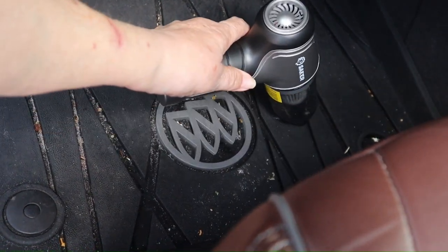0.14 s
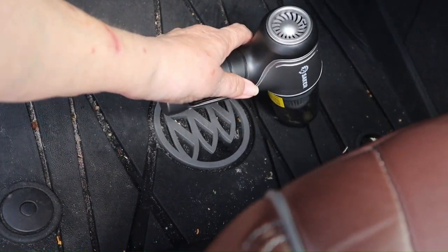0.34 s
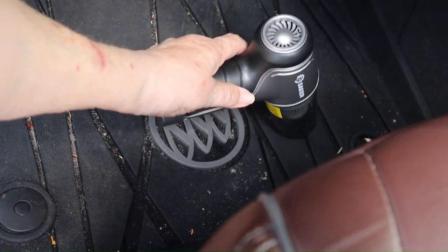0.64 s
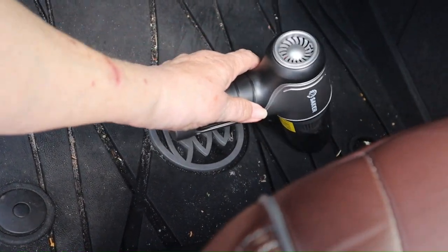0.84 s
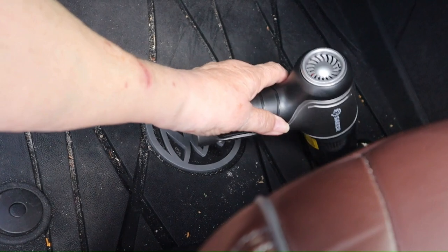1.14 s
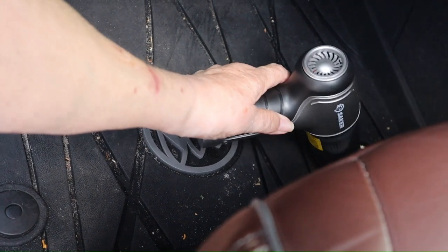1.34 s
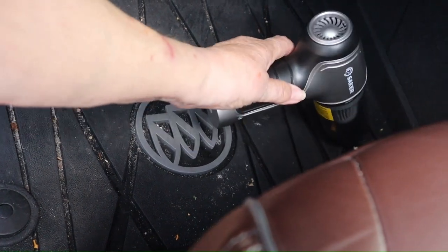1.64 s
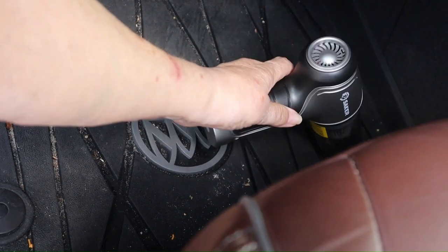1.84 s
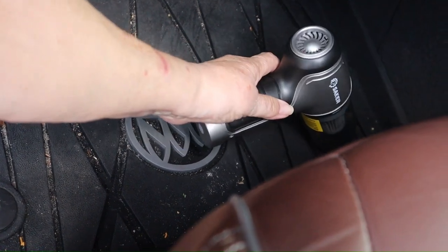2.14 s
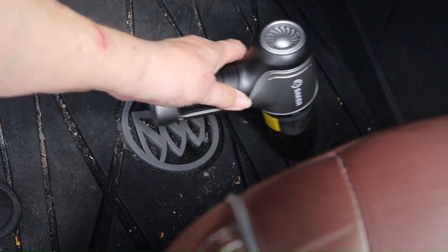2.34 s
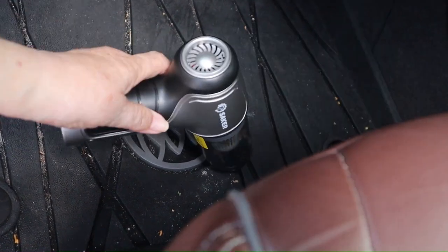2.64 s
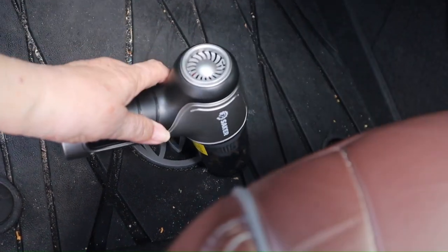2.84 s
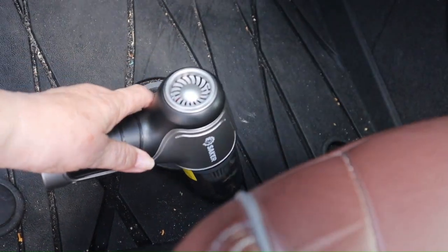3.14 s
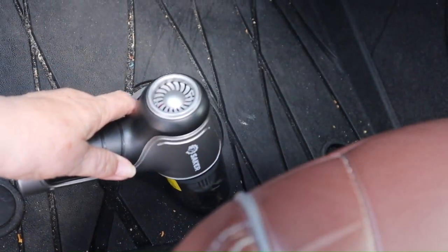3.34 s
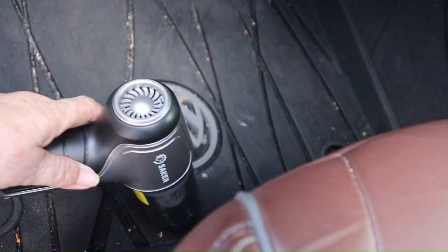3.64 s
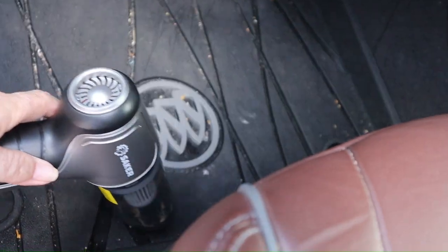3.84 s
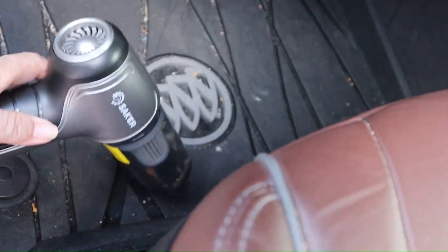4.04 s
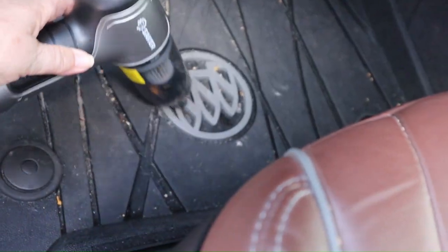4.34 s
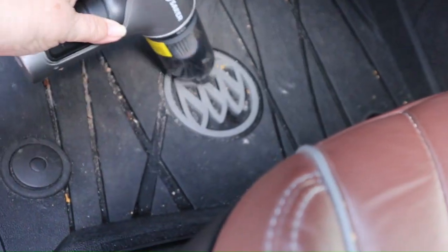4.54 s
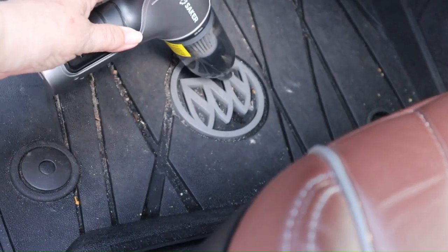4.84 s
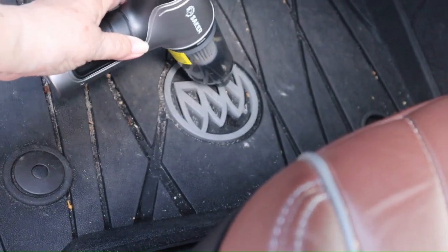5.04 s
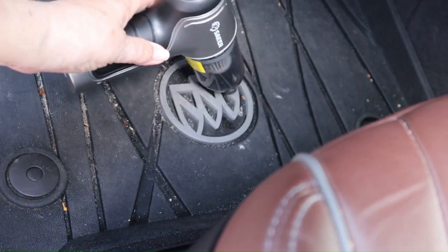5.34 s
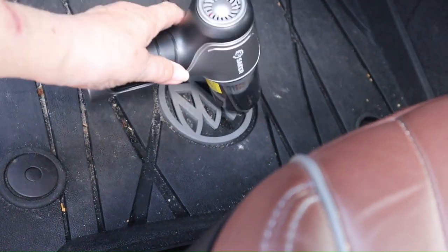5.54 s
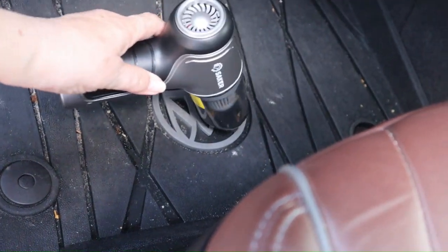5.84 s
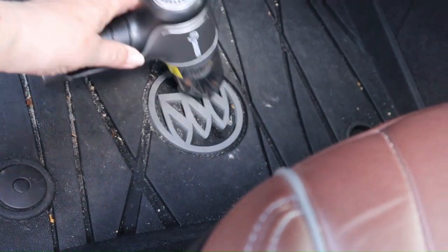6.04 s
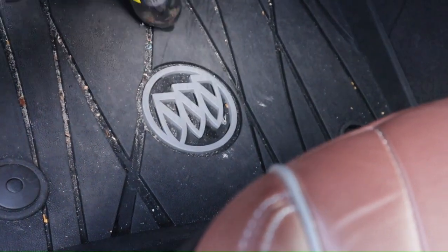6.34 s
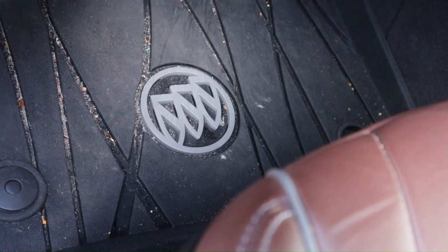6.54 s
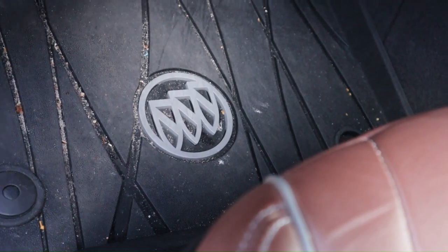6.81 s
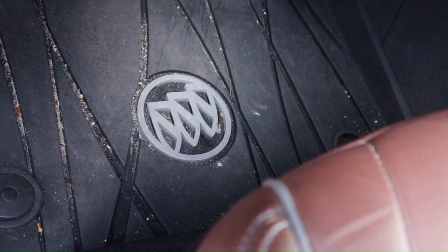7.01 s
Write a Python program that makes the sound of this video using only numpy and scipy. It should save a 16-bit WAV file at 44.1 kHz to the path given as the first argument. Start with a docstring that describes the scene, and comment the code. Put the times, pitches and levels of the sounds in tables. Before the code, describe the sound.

A close stereo pair catches a handheld vacuum working over a ribbed rubber mat in a small, dry car interior. Its whistling motor and airy hiss never stop. The tone wavers with each press, a burst of crumb clicks and gritty rasps comes before the middle, then the blocked nozzle makes the motor race higher. It drops back, continuing with dull bumps, fluttering air and short hisses, still running at the end.

```python
"""Cordless vacuum in a car footwell

Inside a car, a close stereo pair hears a small vacuum pushed over a ribbed rubber mat.
The motor whines near 1 kHz as summed harmonics; its speed also sets how far the nozzle counts as choked.
Coloured noise makes the rush, hiss and flutter of air, the gritty scuffs and short hisses in narrow bands.
Impulses ring the mat as bumps and the tube as crumb ticks; a faint hum and rumble fill the car."""
import sys
import numpy as np
from scipy import signal
from scipy.fft import rfft, irfft, next_fast_len
from scipy.io import wavfile

SR = 44100
rng = np.random.default_rng(int(sys.argv[2]) if len(sys.argv) > 2 else 0)


def dump_mix(stems):
    """Bounce the given channels to the path in sys.argv[1] as a 16-bit WAV at rate SR."""
    frames = np.atleast_2d(stems).T  # one column per channel
    limited = np.clip(frames, -1, 1)  # hard clip at full scale
    pcm = np.round(limited * 32767).astype(np.int16)
    wavfile.write(sys.argv[1], SR, pcm)


N = 316197
TIME = np.arange(N) / SR  # s

# car hum where the microphones are [t/s, level/dB]
CAR_HUM = [(0, -53), (3.5, -58), (4.1, -48), (6.0, -46.5), (7.17, -61)]
# colour of the car's rumble [f/Hz, density/dB]
CABIN_COLOUR = [(20, -26), (35, -27), (55, -2), (100, -9), (180, -2), (350, -3.5), (700, -21)]

# air at the two microphones: share of power in common [f/Hz, share 0-1]
MIC_LIKENESS = [(100, .985), (450, .96), (1000, .9), (2000, .8), (3000, .68), (6000, .63), (12000, .6)]
# phase by which the left microphone leads [f/Hz, lead/rad]
MIC_LEAD = [(0, 0), (1380, 0.08), (2150, 1.72), (2580, 1), (3530, 2), (4480, 4), (4910, 4), (5860, 4.5),
            (7150, 4.5), (7920, 4), (9730, 4), (15300, 4)]
# left-right balance of the air [f/Hz, left minus right/dB]
MIC_TILT = [(200, 1.1), (550, 0), (800, -5), (1400, 4.5), (2000, -6), (2800, 0), (3800, 1), (5200, 4),
            (7000, 0.5), (8500, -0.5), (11000, 1)]

# ringing modes of the mat on the floor [f/Hz, level/dB, t60/s]
MAT_MODES = [(62, -20, .12), (120, -7, .06), (175, 0, .035), (280, -6, .025), (480, -10, .02)]
# colour of the mat's shudder as the nozzle settles [f/Hz, density/dB]
SHUDDER_COLOUR = [(35, -28), (65, -17), (110, 5.5), (170, -2), (280, 1.5), (500, -0.5), (1200, -39),
                  (4000, -55)]
# nozzle bumps on the mat [t/s, thud level/dB, shudder level/dB]
BUMP_EVENTS = [(1.828, -25, -26), (2.297, -35, -30), (2.529, -37, -35), (2.666, -31, -39),
               (4.424, -29.5, -37), (4.633, -31, -35), (5.054, -22, -31), (5.248, -30.5, -35),
               (6.165, -36, -27), (6.469, -27, -31), (6.689, -32, -29)]
SHUDDER_T60_S = 0.24

# nozzle scuffs over grit [centre t/s, length/s, level/dB]
SCUFF_EVENTS = [(0.317, 0.045, -24), (0.48, 0.032, -24), (0.83, 0.024, -26), (0.966, 0.037, -21.5),
                (1.205, 0.028, -27), (1.303, .025, -31), (2.336, .025, -30), (2.534, .008, -22),
                (2.57, 0.023, -24), (2.605, 0.016, -17.5), (2.668, 0.01, -17.5), (2.756, 0.04, -23.5),
                (5.66, 0.54, -28), (6.147, 0.019, -25), (6.49, 0.15, -25.5)]
# colour of the grit [f/Hz, density/dB]
GRIT_COLOUR = [(100, -35), (400, -17), (1200, -16), (2000, -3), (2700, 0), (4000, -5), (8000, -7),
               (12000, -13), (15000, -27)]
GRAINS_PER_S, GRAIN_DECAY_S = 1100, .0007
# short band hisses: leaks under the lip, and resonances of the choked hiss near 3 s
# [centre t/s, length/s, level/dB, centre f/Hz, band width/Hz]
BAND_HISS_EVENTS = [(0.334, .025, -18, 2230, 600), (.45, .1, -25.5, 11000, 4000),
                    (.625, .03, -25, 11800, 2600), (.92, .04, -22, 11200, 1700),
                    (.96, .025, -25, 8700, 1000), (1.06, .05, -25.5, 2300, 700),
                    (1.2, .03, -25, 11200, 2000), (2.44, .03, -25, 4200, 1400),
                    (2.516, .006, -17, 2950, 500), (2.54, 0.018, -19, 2920, 600),
                    (2.538, .018, -25, 8400, 800), (2.576, .009, -19, 4300, 800),
                    (2.585, .02, -22, 11700, 3000), (2.609, .006, -18.5, 4200, 700),
                    (2.608, .007, -20, 8000, 1500), (2.63, .015, -25, 10700, 900),
                    (2.735, .015, -20.5, 10800, 900), (2.86, .2, -26.5, 5200, 900),
                    (3.0, .12, -27, 6700, 700), (3.33, .1, -32, 6200, 250), (3.53, .12, -29, 4150, 400),
                    (3.86, 0.18, -31, 3900, 2400), (5.673, 0.087, -22, 4500, 2600),
                    (5.91, .06, -27, 4000, 600), (6.065, .025, -27, 8300, 1400),
                    (6.13, .04, -22.5, 4200, 1600), (6.14, 0.028, -20, 2900, 900),
                    (6.19, 0.012, -15.5, 2680, 500), (6.49, .07, -27, 11500, 3800),
                    (6.62, .12, -24, 3500, 1400)]
# big crumbs in the tube, before a random strength [t/s, level/dB]
BIG_CRUMBS = [(2.3234, -18), (2.3774, -19), (2.4864, -20), (2.5138, -16), (2.5321, -15.5), (2.5504, -15),
              (2.5774, -16), (2.6055, -15.5), (2.6624, -14.5), (2.6862, -17), (2.7288, -19),
              (2.7984, -16.5)]
# ringing modes of plastic tube and dust cup [f/Hz, level/dB, t60/s]
CUP_MODES = [(2300, 0, .005), (3100, -1, 0.006), (4300, -3, 0.003), (6100, -5, .002), (8200, -7, 0.002),
             (11200, -8, .002)]

# colours of the air, nozzle open or choked [f/Hz, density/dB]
OPEN_RUSH = [(100, -64), (700, -35), (880, 0.5), (1150, -5.5), (1300, -5.5), (1700, -6), (2100, 4),
             (2400, 1), (2900, 3), (3350, -0.5), (3700, -4), (5000, -8.5), (12000, -63)]
CHOKED_RUSH = [(50, -50), (210, -10.5), (340, -23.5), (470, -13), (620, -33), (950, -9), (1080, -31),
               (1400, -29), (1750, -8.5), (2000, 5), (2500, -2), (2950, -5), (3500, -55), (6000, -40)]
# colours of the vent hiss, fan open or choked [f/Hz, density/dB]
OPEN_HISS = [(100, -12.5), (600, -6), (1200, -9), (2500, -3), (4000, 7.5), (4500, 0.5), (5200, 5.5),
             (6800, 6), (7700, -0.5), (8400, 9), (9400, 2.5), (10200, 3.5), (11500, 5), (13000, 0),
             (14500, -7.5), (15700, -55)]
CHOKED_HISS = [(200, -55), (2000, -4), (3500, -7.5), (4200, -1.5), (6300, -3), (7750, -7), (8250, 6.5),
               (8700, 3), (9400, -16), (10150, 0), (10750, -13), (11400, -2.5), (13000, -13), (15500, -23)]
# colour of the flutter at the mat [f/Hz, density/dB]
FLUTTER_COLOUR = [(25, -49), (80, -4), (150, -8), (260, -9), (380, 5), (520, 6), (660, -2.5), (800, 0.5),
                  (1200, -10.5), (4000, -62)]
# nozzle tube resonances under light load [f/Hz, half width at -6 dB/Hz, level/dB]
TUBE_MODES = [(1990, 160, 1.5), (2417, 76, 8), (2870, 82, 5), (2980, 170, 4.5), (8400, 150, -21)]
# resonances of the narrow gap between lip and mat [f/Hz, half width at -6 dB/Hz, level/dB]
GAP_MODES = [(590, 120, -6), (2530, 130, -1), (2850, 260, -3.5), (3380, 110, -2)]
TUBE_WAVER, GAP_WAVER = .015, .03  # rms share of the pitch
TUBE_FLICKER_DB = 2.2  # rms

# air layers, one row each [running free/dB, gain at full suction/dB, gain when choked/dB, share of shading]
RUSH_LEVELS = (-26.5, 4.5, 3, 0.95)
VENT_LEVELS = (-31.5, 6.5, -0.3, 0.77)
MAT_LEVELS = (-37.5, -3, -5, 3)
FREE_SPEED, SUCTION_SPAN = 1011.4, 83  # turns per s
# level of nozzle and vents as the body turns away and back [t/s, level/dB]
BODY_SHADE = [(0, 1.5), (1.3, 1), (1.62, 0.6), (1.85, 1.2), (2.3, 2), (3.4, 0), (3.7, -3), (4.15, -2.5),
              (4.7, -1), (5.9, 0.6), (6.6, 1), (6.85, -0.1), (7.17, 0.5)]
# lip pressed onto the mat; level changes may be negative
# [start t/s, end t/s, rush change/dB, hiss change/dB, flutter change/dB, gap howl/dB]
LIP_PRESSES = [(-.05, 0.266, 3, 2.5, -5.5, -39), (0.29, 0.452, 2, 1.2, -6, -50),
               (0.72, 0.955, -0.5, 1.8, 0, -34), (0.985, 1.168, 1.5, -1, 0, -50),
               (1.138, 1.476, 0, 0.2, 4, -24.5), (1.286, 1.332, 2, 1.5, 4, -27),
               (2.298, 2.339, 0.5, 1, 3, -24), (2.37, 2.5, 2.5, 2.5, 0.5, -34),
               (2.515, 2.587, 7, 6.5, 2.5, -46), (2.606, 2.8, 3.5, 2, -1.5, -51),
               (3.73, 4.006, 4, 0, 7.5, -43), (3.807, 3.898, -2.5, -2.5, 7.5, -42),
               (4.647, 4.857, 2.5, 0.5, 1, -54), (5.615, 5.774, 4.5, 1.5, 1.5, -32),
               (6.03, 6.224, 4, 3, -1.5, -35), (6.344, 6.743, 4, 1, 5, -34),
               (6.447, 6.63, -0.5, 0, -0.5, -40)]
PRESS_ATTACK_S, PRESS_RELEASE_S = 0.018, 0.015
FREE_HOWL_DB = -50  # before body shading

# motor speed [t/s, turns per s]
MOTOR_SPEED = [(0.0, 990), (0.39, 1096), (0.6, 1086), (0.78, 1042), (0.97, 1028), (1.09, 1074),
               (1.35, 1016), (1.6, 986), (2.49, 982), (2.57, 1031), (2.7, 1030), (2.86, 1073), (3.04, 1143),
               (3.21, 1240), (3.45, 1277), (3.56, 1261), (3.74, 1173), (3.89, 1052), (4.08, 985),
               (4.25, 955), (4.9, 971), (6.01, 978), (6.1, 1011), (6.23, 1005), (6.4, 1039), (6.7, 1022),
               (6.93, 995), (7.17, 987)]
SPIN_UP_S = 0.13  # the speed follows the choking by this much
# shaft tone as the body is turned in the hand [t/s, level/dB, left minus right/dB]
SHAFT_TONE = [(0, -21.5, -16), (.18, -18.5, -11.5), (.42, -26, -8.5), (.88, -21, -12), (1.25, -26.5, 1.5),
              (1.65, -27, 3), (2.27, -25, 3.5), (2.54, -22, -22), (2.7, -25.5, -23), (2.81, -33, 4),
              (3.0, -34, 2), (3.12, -23, -8), (3.47, -40, 5), (3.73, -25.5, 17), (4.17, -38, 6),
              (4.68, -25.5, -4), (5.32, -22.5, -2), (6.6, -23, 1.5), (7.17, -32, 3)]
# standing-wave nodes of the shaft tone sweep past the microphones [t/s, left lead/rad]
SHAFT_LEAD = [(0, 0), (2.65, -.2), (2.95, -4.1), (3.8, -4.6), (4.2, -12.4), (7.17, -12.4)]
# octave of the shaft tone [t/s, level/dB]
OCTAVE_TONE = [(0, -37), (.3, -31), (.7, -27), (1.0, -37), (1.15, -33), (1.38, -45), (1.53, -26),
               (2.5, -33), (3.0, -20), (3.17, -31), (3.5, -27), (3.75, -33.5), (4.7, -34.5), (5.35, -27),
               (6.03, -29.5), (6.12, -37), (6.75, -39), (7.1, -27.5)]
# upper whine before shading [t/s, third harmonic level/dB, fourth harmonic level/dB]
UPPER_WHINE = [(0, -27.5, -37), (.38, -27, -37), (.62, -31, -42), (.85, -27.5, -42), (1.2, -30.5, -39),
               (1.4, -36, -42), (1.55, -33, -45), (1.85, -40, -37.5), (2.35, -33, -39), (2.75, -32, -37),
               (3.1, -35, -41), (3.35, -39, -46), (3.75, -36, -38), (3.95, -28, -41), (4.15, -32.5, -43),
               (4.45, -29.5, -34), (4.75, -32.5, -36), (5.0, -27.5, -35), (5.55, -32, -35),
               (5.85, -29, -39), (6.2, -33, -40), (6.42, -29, -38), (6.55, -36, -38), (6.9, -31, -35),
               (7.17, -32.5, -39)]
# faint high harmonics before choking and shading [multiple of shaft speed, level/dB, left minus right/dB]
HIGH_HARMONICS = [(6, -47, 4), (8, -46, -6)]
# blade tone as the vents turn, before vent resonance and shading [t/s, level/dB]
BLADE_TONE = [(0, -33), (.12, -31), (.22, -26), (.45, -33), (.7, -32), (.9, -38), (1.1, -31), (1.4, -35),
              (1.62, -41), (1.85, -37), (2.3, -34), (2.5, -38), (2.95, -36), (3.15, -31.5), (3.48, -33.5),
              (3.72, -29), (3.86, -43), (4.05, -35), (4.2, -38), (4.35, -33), (4.65, -39), (4.85, -34),
              (5.08, -38), (5.3, -31.5), (5.7, -33), (5.87, -35), (6.06, -26.5), (6.2, -38), (6.5, -29),
              (6.8, -34), (6.97, -28), (7.17, -33)]
BLADES = 7
VENT_HZ, VENT_WIDTH_HZ, VENT_DB = 8420, 400, 10  # vent resonance: centre, half width, peak gain
# ball bearing's whistle before shading [t/s, whistle level/dB, first lower sideband level/dB]
BEARING_WHISTLE = [(0, -46, -46), (.2, -34, -44), (.33, -42, -47), (.62, -46, -46), (.78, -31.5, -46),
                   (1.0, -33.5, -47), (1.14, -41, -48), (1.28, -35.5, -48), (1.5, -48, -48),
                   (1.9, -45, -37), (2.35, -43, -38), (2.5, -44, -45), (2.73, -30, -45), (2.95, -41, -50),
                   (3.1, -37, -46), (3.45, -48, -50), (3.8, -44, -47), (3.93, -36, -46), (4.1, -44, -50),
                   (4.3, -38, -50), (4.7, -46, -48), (5.25, -48, -43), (5.5, -40, -42), (6.33, -41, -46),
                   (6.53, -29.5, -44), (6.75, -35, -44), (7.0, -42, -40), (7.17, -41, -40)]
BEARING_ORDER = 4.85  # multiple of the shaft speed

CUTOFF_HZ = 15600


def from_db(db):
    """Decibels to gain."""
    return 10 ** (np.asarray(db) / 20)


def rms_one(x):
    """Scale to unit power."""
    return x / np.sqrt(np.mean(x ** 2) + 1e-20)


def in_time(rows):
    """Each column of a time table at every sample."""
    s, *columns = np.transpose(rows)
    return [np.interp(TIME, s, column) for column in columns]


def at_hz(points, hz):
    """Read a spectrum on a log-frequency axis."""
    known_hz, values = np.transpose(points)
    return np.interp(np.log(hz + 1), np.log(known_hz), values)


def butterworth(x, order, hz, kind):
    """Causal Butterworth filter."""
    return signal.sosfilt(signal.butter(order, hz, kind, fs=SR, output="sos"), x)


def panned(pan_db):
    """Left and right gains of unit mean power."""
    gains = from_db(np.array([[.5], [-.5]]) * pan_db)
    return gains / np.sqrt(np.mean(gains ** 2, axis=0))


def phase_split(lead):
    """Phase turns that put the left microphone ahead of the right by lead radians."""
    return np.exp(np.array([[.5j], [-.5j]]) * lead)


def drift(rate):
    """Smooth random wander of rms 1: noise through two equal low-pass poles at rate Hz."""
    step = 20  # samples between drawn points
    r = np.exp(-2 * np.pi * rate * step / SR)
    noise = rng.standard_normal(N // step + 2002)
    slow = signal.lfilter([1], [1, -2 * r, r * r], noise)[2000:]  # skip the filter's start
    return np.interp(np.arange(N) / step, np.arange(len(slow)), rms_one(slow))


def air_noise(spectrum, off_axis=1):
    """Turbulence of a given colour, part shared and part separate at the microphones; rms 1."""
    size = next_fast_len(N)
    hz = np.fft.rfftfreq(size, 1 / SR)
    white = rfft(rng.standard_normal((3, size)))
    alike = np.clip(at_hz(MIC_LIKENESS, hz), 0, 1)
    shared = white[2] * phase_split(off_axis * at_hz(MIC_LEAD, hz))
    both = np.sqrt(alike) * shared + np.sqrt(1 - alike) * white[:2]
    colour = panned(at_hz(MIC_TILT, hz)) * from_db(at_hz(spectrum, hz))
    return rms_one(irfft(both * colour, size)[:, :N])


def resonances(modes):
    """Spectrum (Hz, dB) of a few resonances with steep skirts."""
    hz = np.geomspace(30, SR / 2, 2000)
    power = 0
    for centre, width, level_db in modes:
        power = power + from_db(level_db) ** 2 / (1 + ((hz - centre) / width) ** 2) ** 2
    return np.column_stack([hz, 10 * np.log10(power)])


def wavering(x, share, rate):
    """Slide all pitches of a sound up and down at random, by an rms share of the pitch."""
    read = TIME + np.cumsum(share * drift(rate)) / SR
    return rms_one(np.array([np.interp(read % TIME[-1], TIME, side) for side in x]))


def ring(strikes, hz, t60):
    """A unit strike sets a decaying sine of initial height 1 ringing."""
    r = np.exp(-np.log(1000) / (t60 * SR))
    w = 2 * np.pi * hz / SR
    return signal.lfilter([0, np.sin(w)], [1, -2 * r * np.cos(w), r * r], strikes + 1e-18)


def swell(s, length):
    """Bell-shaped envelope of height 1 centred on s."""
    return np.exp(-2 * ((TIME - s) / length) ** 2)


def cabin(hum_hz, rumble_db):
    """A low sine hum, stronger in some spots, and soft noise rumble fill the car."""
    hum_db, = in_time(CAR_HUM)
    hum = np.sqrt(2) * np.sin(2 * np.pi * hum_hz * TIME) * from_db(hum_db + 1.0 * drift(5.4))
    return hum + from_db(rumble_db) * air_noise(CABIN_COLOUR)


def bumps():
    """Each knock is an impulse into the rubber mat, which answers with a dull thud and a short shudder."""
    pushes, shudder, thud = np.zeros(N), np.zeros(N), 0
    for s, level_db, shudder_db in BUMP_EVENTS:
        pushes[int(s * SR)] += from_db(level_db)
        age = np.maximum(TIME - s, 0)
        rise = 1 - np.exp(-age / 0.012)
        shudder += from_db(shudder_db) * rise * np.exp(-np.log(1000) * age / SHUDDER_T60_S)
    for hz, level_db, t60 in MAT_MODES:
        thud = thud + from_db(level_db) * ring(pushes, hz, t60)
    return thud + shudder * air_noise(SHUDDER_COLOUR)


def scuffs():
    """Grains snap under the lip as it drags over a rib, nearly straight ahead of the microphones."""
    envelope = sum(from_db(level_db) * swell(s, length) for s, length, level_db in SCUFF_EVENTS)
    snaps = (rng.random(N) < GRAINS_PER_S / SR) * rng.uniform(.3, 1, N)
    decay = np.exp(-1 / (GRAIN_DECAY_S * SR))
    grains = rms_one(np.tanh(signal.lfilter([1], [1, -decay], snaps + 1e-18)))
    return envelope * grains * air_noise(GRIT_COLOUR, off_axis=.2)


def band_hisses():
    """Leaks under the lip and resonances of the choked hiss: bands of one noise jet whose level flickers."""
    jet, out = air_noise([(1000, 0), (15000, 0)], off_axis=.7), 0
    for s, length, level_db, hz, width_hz in BAND_HISS_EVENTS:
        hiss = rms_one(butterworth(jet, 2, [hz - width_hz / 2, hz + width_hz / 2], "band"))
        out = out + from_db(level_db) * swell(s, length) * hiss
    return out * from_db(3.5 * np.tanh(drift(120)) - 1)


def crumbs(hiss_db, per_s, size_db):
    """Crumbs strike and ring the tube at random, more often when the vents hiss louder; big ones stand out."""
    pickup = rms_one(from_db(hiss_db))
    sizes_db = size_db + 4.5 * np.minimum(rng.exponential(1, N), 3)
    hits = (rng.random(N) < per_s * pickup ** 2 / SR) * from_db(sizes_db)
    for s, level_db in BIG_CRUMBS:
        hits[int(s * SR)] += from_db(level_db)
    out = np.zeros((2, N))
    for hz, level_db, t60 in CUP_MODES:
        # random strength and sign on each side and mode
        strikes = hits * np.tanh(2 * rng.standard_normal((2, N)))
        out += from_db(level_db) * ring(strikes, hz, t60)
    return out


def pressed(start, end):
    """The lip closes on the mat, holds and lets go: 0-1."""
    closing, opening = (TIME - start) / PRESS_ATTACK_S, (end - TIME) / PRESS_RELEASE_S
    return np.clip(.5 + np.minimum(closing, opening), 0, 1)


def air_levels(speed, choke):
    """Rush, hiss, flutter and howl in dB: they follow suction and choking and change with each press."""
    suction = np.clip((speed - FREE_SPEED) / SUCTION_SPAN, 0, 1)
    shade_db, = in_time(BODY_SHADE)
    levels = []
    for free, strained, choked, share in (RUSH_LEVELS, VENT_LEVELS, MAT_LEVELS):
        levels.append(free + strained * suction + choked * choke + share * shade_db)
    rush, hiss, flutter = levels
    howl = from_db(FREE_HOWL_DB + shade_db)
    for start, end, rush_db, hiss_db, flutter_db, howl_db in LIP_PRESSES:
        contact = pressed(start, end)
        rush = rush + rush_db * contact
        hiss = hiss + hiss_db * contact
        flutter = flutter + flutter_db * contact
        howl = howl + from_db(howl_db) * contact
    return rush, hiss, flutter, 20 * np.log10(howl)


def airflow(load, choke, rush_db, hiss_db, flutter_db, gap_db):
    """Nozzle rush turns into a pipe roar as the mat closes the mouth; vents hiss, the gap flutters and howls."""
    is_open, is_choked = np.sqrt(1 - choke), np.sqrt(choke)  # equal-power crossfade
    nozzle = is_open * air_noise(OPEN_RUSH) * from_db(-0.65 - 4.2 * load + 0.37 * drift(18.0))
    tube = wavering(air_noise(resonances(TUBE_MODES)), TUBE_WAVER, rate=3)
    nozzle += np.sqrt(load) * is_open * tube * from_db(-4.0 + TUBE_FLICKER_DB * drift(37))
    nozzle += is_choked * air_noise(CHOKED_RUSH) * from_db(3.0)
    hiss = is_open * air_noise(OPEN_HISS) * from_db(4.5 + .5 * drift(30.0))
    hiss += is_choked * air_noise(CHOKED_HISS) * from_db(5.0)
    flutter = air_noise(FLUTTER_COLOUR) * from_db(-1.7 - 6.6 * choke + 2.0 * drift(22.0))
    gap = wavering(air_noise(resonances(GAP_MODES)), GAP_WAVER, rate=5)
    howl = gap * from_db(gap_db + 1.8 * drift(40.0))
    return from_db(rush_db) * nozzle + from_db(hiss_db) * hiss + from_db(flutter_db) * flutter + howl


def eddies(x, depth_db, rate):
    """Eddies of different sizes come and go separately, so each treble band flickers on its own."""
    def up_to(edge_hz):
        return signal.sosfiltfilt(signal.butter(4, edge_hz, fs=SR, output="sos"), x)
    out = below = up_to(4200)
    for edge_hz in (6000, 8000, 11000):
        wider = up_to(edge_hz)
        out = out + (wider - below) * from_db(depth_db * drift(rate))
        below = wider
    return out + (x - below) * from_db(depth_db * drift(rate))


def footwell(x, strength, sway_s, count=5):
    """Close reflections off mat, seat and console comb the sound; their paths change as the hand moves."""
    out = x.copy()
    for k, delay in enumerate(np.geomspace(.0016, .0075, count)):  # s
        path = delay + sway_s * drift(0.41)
        for side in range(2):
            heard = np.interp(TIME - path - rng.uniform(0, 0.00022), TIME, x[side])
            # small surfaces throw back only the short waves
            out[side] += strength * (-1) ** k * butterworth(heard, 1, 1200, "high")
    return out / np.sqrt(1 + count * strength ** 2 / 2)


def tone(phase, level_db, pan_db, lead, scatter, shimmer):
    """One motor line; two random wanders, scatter and shimmer, blur its level and phase on each side."""
    def wander(rate):
        return np.array([drift(rate) + 1j * drift(rate) for side in range(2)]) / np.sqrt(2)
    path = phase_split(lead) + scatter * wander(14.0) + shimmer * wander(12.5)
    path = path / np.sqrt(1 + scatter ** 2 + shimmer ** 2)
    return np.sqrt(2) * from_db(level_db) * panned(pan_db) * np.real(path * np.exp(1j * phase))


def motor(speed, choke):
    """Shaft unbalance and overtones, the fan's blade tone, and a bearing whistle at a fractional multiple."""
    shaft_db, shaft_pan_db = in_time(SHAFT_TONE)
    shaft_lead, = in_time(SHAFT_LEAD)
    octave_db, = in_time(OCTAVE_TONE)
    third_db, fourth_db = in_time(UPPER_WHINE)
    shade_db, = in_time(BODY_SHADE)
    turn = 2 * np.pi * np.cumsum(speed * (1 + .0006 * drift(25.0))) / SR  # shaft angle, rad

    low = tone(turn, shaft_db, shaft_pan_db, lead=shaft_lead, scatter=.06, shimmer=.08)
    low += tone(2 * turn, octave_db, pan_db=-1.5, lead=0.94, scatter=0.089, shimmer=0.34)
    high = tone(3 * turn, third_db, pan_db=-8.0, lead=1.8, scatter=0.25, shimmer=0.3)
    high += tone(4 * turn, fourth_db, pan_db=-11.5, lead=2.27, scatter=0.38, shimmer=0.35)
    for multiple, level_db, pan_db in HIGH_HARMONICS:
        harmonic_db = level_db - 1.6 * choke
        high += tone(round(multiple) * turn, harmonic_db, pan_db, lead=3.3, scatter=0.68, shimmer=0.74)

    # the blade tone flares on a resonance of the vents
    blade_db, = in_time(BLADE_TONE)
    blade_db = blade_db + VENT_DB / (1 + ((BLADES * speed - VENT_HZ) / VENT_WIDTH_HZ) ** 4)
    high += tone(BLADES * turn, blade_db, pan_db=-1, lead=1.9, scatter=.3, shimmer=.4)

    bearing_db, sideband_db = in_time(BEARING_WHISTLE)
    high += tone(BEARING_ORDER * turn, bearing_db, pan_db=4.0, lead=2.1, scatter=0.25, shimmer=0.5)
    # once-a-turn loading gives the whistle two lower sidebands
    high += tone((BEARING_ORDER - 1) * turn, sideband_db, pan_db=1.0, lead=2.0, scatter=0.3, shimmer=0.4)
    second_db = -40 + 1.5 * choke
    high += tone((BEARING_ORDER - 2) * turn, second_db, pan_db=1.0, lead=2.4, scatter=0.88, shimmer=0.28)
    return low + from_db(shade_db) * high


def scene():
    """A choked fan moves less air and runs faster, so speed tells how far the nozzle is closed."""
    speed, = in_time(MOTOR_SPEED)
    load = np.clip((speed - 990) / 50, 0, 1)
    later_speed = np.interp(TIME + SPIN_UP_S, TIME, speed)
    choke = np.clip((later_speed - 1085) / 95, 0, 1)
    rush_db, hiss_db, flutter_db, gap_db = air_levels(speed, choke)
    air = airflow(load, choke, rush_db, hiss_db, flutter_db, gap_db)
    air = eddies(air, depth_db=.8, rate=6)
    bursts = scuffs() + band_hisses() + crumbs(hiss_db, per_s=37, size_db=-35)
    rush = footwell(air + bursts, strength=.22, sway_s=.00012)
    return cabin(hum_hz=101.3, rumble_db=-47.0) + bumps() + rush + motor(speed, choke)


def record(dry):
    """Deepest bass is filtered out and the highest peaks are clipped; the top is cut steeply."""
    thin = np.clip(butterworth(dry, 2, 26, "high"), -.85, .85)
    return signal.sosfilt(signal.ellip(12, .1, 90, CUTOFF_HZ, fs=SR, output="sos"), thin)


dry = scene()
out = record(dry)
dump_mix(out)
```